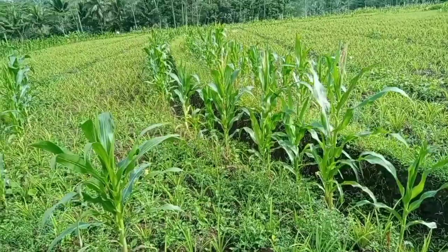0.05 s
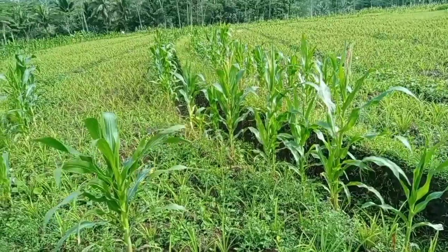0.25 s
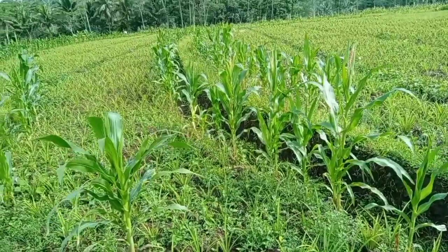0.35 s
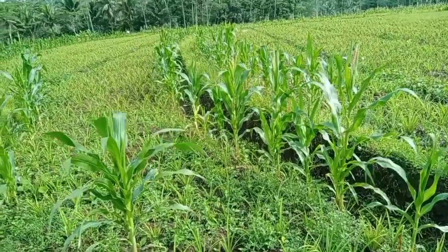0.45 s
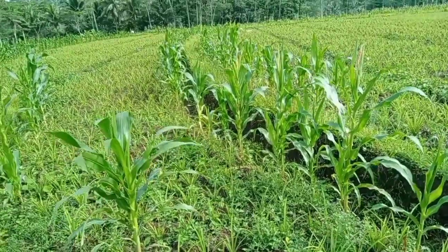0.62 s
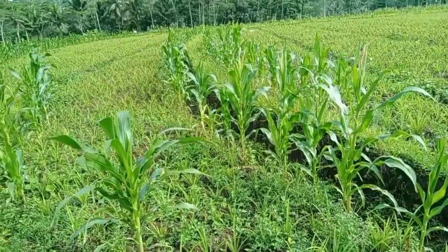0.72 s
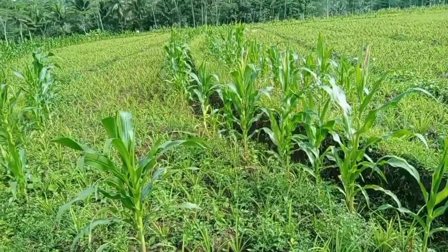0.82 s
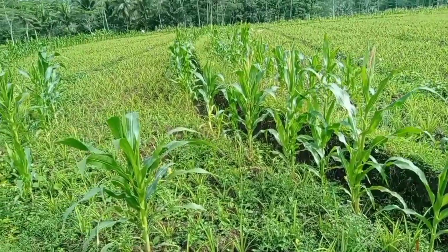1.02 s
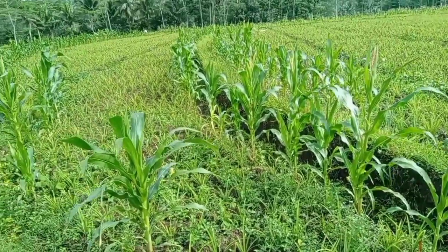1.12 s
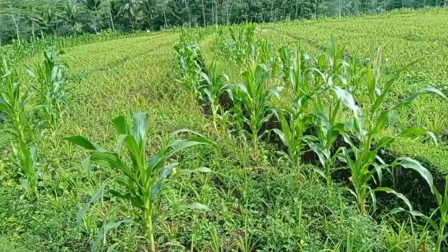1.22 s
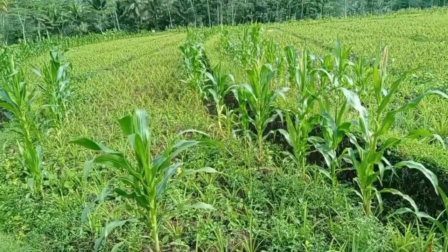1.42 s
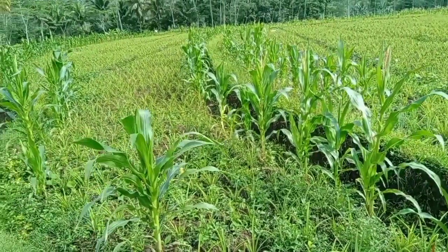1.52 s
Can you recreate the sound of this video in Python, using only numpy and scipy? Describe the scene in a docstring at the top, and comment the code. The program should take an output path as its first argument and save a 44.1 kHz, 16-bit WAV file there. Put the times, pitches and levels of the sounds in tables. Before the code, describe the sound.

Water trickles steadily along a ditch in an open field for about one and a half seconds, a fine bubbling with small plops, gurgles and splashes over a distant rush. From about 0.2 to 0.7 seconds a gust of wind buffets the microphone with low rumble and thumps, then drops to light puffs. Faint high insect buzzing and a thin cricket tone continue behind the water.

```python
"""Trickling ditch in a breezy field

Water trickles along a ditch: a fizz of small ringing bubbles with louder plops, gurgles and splashes,
over a far rush. Wind eddies buffet the microphone, in one strong gust and then in light puffs.
Insects sing in the grass: two high buzzes of falling wing strokes and thin cricket tones."""
import sys
import numpy as np
from scipy import signal
from scipy.io import wavfile
from scipy.ndimage import uniform_filter1d

SR = 44100
rng = np.random.default_rng(int(sys.argv[2]) if len(sys.argv) > 2 else 0)


def generate_wav(sig):
    """Save sig (samples, or channels by samples) to the path in sys.argv[1] as 16-bit PCM at SR."""
    pcm = np.round(np.clip(np.atleast_2d(sig).T, -1, 1) * 32767).astype(np.int16)
    wavfile.write(sys.argv[1], SR, pcm)


N = 68355
TIME = np.arange(N) / SR
WATER_EDGE_HZ = 4920  # the bubbles' treble ends here

# Colour of the far rush of water and field. Each row: frequency in Hz, relative level in dB.
RUSH_COLOUR = [(30, 2), (100, 7), (300, 1.5), (600, 2), (1100, -6.5), (1700, -3), (2400, 6), (3500, -3.5),
               (4300, -5), (4750, -12), (5050, -20.5), (5600, -18), (6500, -31.5), (7400, -20), (9200, -11),
               (10500, -23), (12500, -30), (15500, -37)]
# Fader ride of the wind. Each row: time in seconds, relative level in dB.
WIND_LEVEL = [(0, -45), (.034, -37.5), (.06, -56), (.09, -44), (.13, -32.5), (.168, -41), (.212, -17.5),
              (.245, -24.5), (.275, -21), (.325, -21), (.355, -26), (.385, -18), (.42, -18.5), (.46, -30),
              (.49, -24.5), (.53, -30), (.575, -28), (.612, -23.5), (.646, -36.5), (.668, -26.5),
              (.735, -55), (.765, -47), (.785, -29.5), (.866, -41.5), (.92, -33), (.962, -35.5),
              (1.01, -49.5), (1.07, -32.5), (1.118, -49), (1.204, -34), (1.252, -31), (1.306, -38.5),
              (1.34, -49), (1.39, -32.5), (1.48, -47.5), (1.55, -46)]
# Colour of the wind at full strength. Each row: frequency in Hz, relative level in dB.
WIND_COLOUR = [(25, -20), (45, -8), (65, -0.5), (110, 2), (170, -5), (280, -10), (400, -18.5), (600, -26),
               (1000, -65)]
# Colour of the fizz. Each row: bubble pitch in Hz, relative level in dB.
BUBBLE_COLOUR = [(700, -18), (1200, -13), (1600, -8), (2050, 0), (2600, 2.5), (3200, -4), (3900, -8),
                 (4600, -10)]
# Louder single bubbles. Each row: start in seconds, relative level in dB, pitch in Hz.
PLOPS = [(.0528, -22.5, 2250), (.0912, -28, 2990), (.1271, -26.5, 2110), (0.1457, -21, 2670),
         (0.2067, -23, 2480), (0.226, -33, 3020), (0.2616, -24, 2000), (0.538, -26.5, 1940),
         (.5621, -30, 1980), (.636, -24, 2330), (.7751, -34, 2070), (.8335, -27, 2880), (0.9605, -21, 2400),
         (1.038, -26, 2650), (1.0876, -25.5, 2600), (1.1336, -20.5, 1960), (1.182, -26.5, 1970),
         (1.4206, -27.5, 2580)]
# Fader rides of the two buzzing insects. Each row: time in seconds, relative level in dB.
HIGH_BUZZ_LEVEL = [(0, -64), (.47, -67.5), (.51, -84), (.72, -83), (.86, -71), (1.15, -66), (1.4, -61),
                   (1.55, -61)]
LOW_BUZZ_LEVEL = [(0, -67), (.3, -72), (.62, -77), (.8, -62.5), (.95, -66), (1.18, -65.5), (1.55, -71)]
# Bubble clusters. Each row: start in seconds, length in seconds, relative level in dB, pitch in Hz.
GURGLES = [(0.05, 0.014, -38, 2780), (.09, 0.024, -40, 2750), (0.129, 0.039, -43.5, 2940),
           (0.202, 0.014, -41.5, 2760), (0.228, 0.018, -38.5, 2940), (0.343, .025, -42.5, 2600),
           (.529, .012, -41.5, 808), (0.633, .022, -41.5, 2250), (0.804, 0.032, -43.5, 3000),
           (.84, 0.065, -50.5, 1465), (0.879, .025, -45.5, 3470), (0.918, 0.053, -41.5, 2710),
           (1.032, .03, -42, 2700), (1.105, .035, -48, 905), (1.132, 0.049, -42.5, 2010),
           (1.266, .05, -48, 865), (1.324, 0.043, -42.5, 3190), (1.415, 0.037, -56, 2420),
           (1.474, .028, -43, 2860), (1.522, 0.026, -45, 3650)]
# Drops that splash. Each row: start in seconds, relative level in dB.
SPLASHES = [(0.052, -39.5), (.133, -32), (.155, -32.5), (0.206, -36.5), (0.36, -35), (.468, -41),
            (0.539, -35.5), (.594, -34.5), (0.898, -36), (1.039, -34), (1.061, -40), (1.091, -34.5),
            (1.136, -37), (1.228, -46)]
# Colour of splash and spray. Each row: frequency in Hz, relative level in dB.
SPLASH_COLOUR = [(800, -25), (2000, 3.5), (3200, 6.5), (4600, -2.5), (5200, -13.5), (6500, -15.5),
                 (7500, -10.5), (9200, -6), (10500, -25), (12000, -27), (15000, -41)]
# Single eddies that thump the microphone.
# Each row: centre in seconds, relative level in dB, half width in seconds, swing frequency in Hz.
THUMPS = [(0.2069, -9.5, 0.0014, 193), (0.2231, -12, 0.001, 225), (0.2656, -12.5, 0.002, 149),
          (.292, -16.5, 0.00086, 200), (0.3299, -20, 0.00064, 142), (.341, -17.5, 0.00087, 300),
          (0.375, -16, .0021, 112), (.405, -8, 0.00075, 170), (.416, -9, .0016, 129),
          (.44, -15, .0015, 150), (0.4819, -9.5, 0.00095, 85), (0.5241, -11.5, 0.0012, 184),
          (0.554, -21, .0012, 225), (.611, -11.5, 0.0018, 150), (.782, -26.5, 0.0011, 200),
          (1.2037, -23, 0.0013, 225)]
# Tiny dry ticks. Each row: start in seconds, relative level in dB.
TICKS = [(.5325, -43), (1.393, -37)]


def from_db(db):
    """Decibels to gain."""
    return 10 ** (np.asarray(db) / 20)


def unit_rms(x):
    """Scale to an rms of 1."""
    return x / np.sqrt(np.mean(x ** 2) + 1e-20)


def ride(rows):
    """A fader ride, read at every sample."""
    return np.interp(TIME, *np.transpose(rows))


def colour_db(colour, hz):
    """Read a colour curve on a log-frequency axis."""
    freqs, levels = np.transpose(colour)
    return np.interp(np.log(hz), np.log(freqs), levels)


def drift(rate_hz):
    """Smooth random wander with a spread of 1."""
    hop, run_in = 40, 2000
    pole = np.exp(-2 * np.pi * rate_hz * hop / SR)
    noise = rng.standard_normal(N // hop + run_in + 2)
    wander = signal.lfilter([1], [1, -2 * pole, pole * pole], noise)[run_in:]
    return np.interp(np.arange(N) / hop, np.arange(len(wander)), unit_rms(wander))


def filtered(x, kind, hz, order):
    """A Butterworth low, high or band pass."""
    return signal.sosfilt(signal.butter(order, hz, kind, fs=SR, output="sos"), x)


def noise_bands(low_hz, high_hz, count):
    """Neighbouring bands of unrelated noise, as (centre in Hz, samples)."""
    edges = np.geomspace(low_hz, high_hz, count + 1)
    for low, high in zip(edges, edges[1:]):
        noise = rng.standard_normal(N + SR // 10)
        yield np.sqrt(low * high), filtered(noise, "band", [low, high], order=3)[-N:]


def add(track, start_s, sound):
    """Lay a short sound onto a track."""
    i = int(np.clip(start_s * SR, 0, N - 1))
    track[i:i + len(sound)] += sound[:N - i]


def rush(flicker_db=2.0):
    """The far rush of water and field: a smooth bed, each band flickering a little."""
    bed = sum(from_db(colour_db(RUSH_COLOUR, hz) + flicker_db * drift(33)) * band
              for hz, band in noise_bands(25, 16000, count=56))
    return from_db(-46.5) * unit_rms(bed)


def wind(full_db=-9, knee_hz=148, dulling=0.28, even_s=0.021):
    """Eddies rumble on the microphone port; stronger wind is louder and brighter."""
    level_db = ride(WIND_LEVEL)
    tilt_db_per_octave = dulling * np.maximum(full_db - level_db, 0)
    eddies = np.zeros(N)
    for hz, band in noise_bands(22, 1200, count=14):
        octaves_over_knee = max(np.log2(hz / knee_hz), 0)
        eddies += from_db(colour_db(WIND_COLOUR, hz) - tilt_db_per_octave * octaves_over_knee) * band
    # Even out the noise so that the ride shapes the gusts.
    window = int(even_s * SR)
    power = uniform_filter1d(uniform_filter1d(eddies ** 2, window), window)
    rumble = from_db(level_db - 0.5) * eddies / np.sqrt(power + 1e-20)
    return filtered(rumble, "high", 49.4, order=4)


def bubble(hz, cycles, attack_s, rise=0.072):
    """A bubble rings, dying by 60 dB over the given cycles as its pitch lifts."""
    t60 = cycles / hz
    t = TIME[:int(t60 * SR)]
    phase = 2 * np.pi * hz * t * (1 + rise / 2 * t / t60)
    return np.sin(phase) * from_db(-60 * t / t60) * (1 - np.exp(-t / attack_s))


def trickle(bubbles_per_s=2200, spread_db=4.5):
    """Running water: a fizz of countless small bubbles with a few louder plops on top."""
    fizz, plops = np.zeros(N), np.zeros(N)
    for when, pitch, strength, ring in rng.random((int(bubbles_per_s * N / SR), 4)):
        hz = 700 * (4700 / 700) ** pitch
        accent_db = spread_db * min(-np.log(1 - strength), 4)  # most are quiet, a few stand out
        gain = from_db(colour_db(BUBBLE_COLOUR, hz) + accent_db)
        add(fizz, when * N / SR, gain * bubble(hz, cycles=37.3 * (.5 + ring), attack_s=0.00033))
    for start, db, hz in PLOPS:
        add(plops, start, from_db(db - 2.5) * bubble(hz, cycles=45.3, attack_s=0.00045))
    return filtered(from_db(-46) * unit_rms(fizz) + plops, "low", WATER_EDGE_HZ, order=12)


def ditch(water, t60_s=.06, predelay_s=.003, wet_db=-10.5):
    """The banks of the ditch throw back a short, dense tail."""
    t = TIME[:SR // 10]
    tail = rng.standard_normal(len(t)) * from_db(-60 * t / t60_s) * (t > predelay_s)
    tail /= np.sqrt(np.sum(tail ** 2))
    return water + from_db(wet_db) * signal.fftconvolve(water, tail)[:N]


def buzz(level, strokes_per_s, pitch_hz, fall_hz, unsteady, rough_hz):
    """An insect rubs its wings; each stroke is a short tone that falls in pitch."""
    stroke = np.cumsum(strokes_per_s * (1 + unsteady * drift(1.7))) / SR % 1
    hz = pitch_hz - fall_hz * (stroke - .5) + rough_hz * drift(202)
    tone = np.sin(2 * np.pi * np.cumsum(hz) / SR)
    return from_db(ride(level)) * unit_rms(np.sin(np.pi * stroke) ** 2 * tone)


def cricket(hz, waver_hz, flutter_db):
    """A far cricket: a thin, slightly wavering tone."""
    flutter = from_db(flutter_db * drift(30))
    phase = 2 * np.pi * np.cumsum(hz + waver_hz * drift(65)) / SR
    return unit_rms(flutter * np.sin(phase))


def insects(swells_per_s=7.88, swell_peak_s=0.78, swell_db=4.5, chirp_end_s=0.073, release_s=.015):
    """Two buzzes, the lower one pulsing, with a steady cricket and a lower chirp that soon stops."""
    high = buzz(HIGH_BUZZ_LEVEL, 81, pitch_hz=9860, fall_hz=1020, unsteady=.005, rough_hz=50.4)
    low = buzz(LOW_BUZZ_LEVEL, 72, pitch_hz=8600, fall_hz=443, unsteady=.055, rough_hz=98.5)
    swells = from_db(swell_db * np.cos(2 * np.pi * swells_per_s * (TIME - swell_peak_s)))
    steady = from_db(-63.5) * cricket(hz=4760, waver_hz=21.9, flutter_db=2)
    chirp = from_db(-49.5) * cricket(hz=3970, waver_hz=70, flutter_db=3)
    chirp_fade = np.clip((chirp_end_s - TIME) / release_s, 0, 1)
    return high + swells * low + steady + chirp_fade * chirp


def gurgles(bubbles_per_s=450, spread_octaves=0.304):
    """Folding water lets go clusters of bubbles of about one size."""
    track = np.zeros(N)
    for (start, length, db, centre_hz), draws in zip(GURGLES, rng.random((len(GURGLES), 60, 3))):
        cluster = np.zeros(N)
        count = max(int(bubbles_per_s * length), 3)
        for when, pitch, strength in draws[:count]:
            hz = centre_hz * 2 ** (spread_octaves * (2 * pitch - 1))
            ring = bubble(hz, cycles=47, attack_s=0.00043)
            add(cluster, start + when * length, (.5 + strength) * ring)
        cluster_rms = np.sqrt(np.sum(cluster ** 2) / (length * SR))
        track += from_db(db - 2) * cluster / cluster_rms
    return filtered(track, "low", WATER_EDGE_HZ, order=12)


def splashes(spray_per_s=200, attack_s=0.0005, t60_s=0.02):
    """Drops burst into short soft-edged hisses: a few distinct ones over a fine random spray."""
    hiss = sum(from_db(colour_db(SPLASH_COLOUR, hz)) * band
               for hz, band in noise_bands(700, 16000, count=26))
    spray_hits = rng.random(N) < spray_per_s / SR
    drops = spray_hits * from_db(-48 + np.minimum(rng.exponential(1, N), 4))
    for start, db in SPLASHES:
        add(drops, start, from_db([db]))
    # Each drop opens the hiss and lets it die away; overlapping drops add in power.
    power_decay = np.exp(-2 * np.log(1000) / (t60_s * SR))
    power = signal.lfilter([1], [1, -power_decay], drops ** 2 + 1e-18)
    envelope = uniform_filter1d(np.sqrt(power), int(attack_s * SR) + 1)
    return envelope * unit_rms(hiss)


def thumps(port_q=1.8):
    """An eddy is a brief dip in pressure; the microphone's bass cut makes it swing back."""
    track = np.zeros(N)
    for centre, db, half_width, swing_hz in THUMPS:
        dip = -from_db(db + 0.5) * np.exp(-((TIME - centre) / half_width) ** 2)
        omega = 2 * np.pi * swing_hz
        bass_cut = signal.bilinear([1, 0, 0], [1, omega / port_q, omega ** 2], SR)
        track += signal.lfilter(*bass_cut, dip + 1e-18)
    return track


def ticks(hz=12500, t60_s=0.0033):
    """Tiny dry ticks: pinpricks of very high noise."""
    track, t = np.zeros(N), TIME[:SR // 50]
    for start, db in TICKS:
        add(track, start, from_db(db - 60 * t / t60_s) * rng.standard_normal(len(t)))
    return filtered(track + 1e-18, "band", [hz / 1.25, hz * 1.25], order=2)


def splat(start_s=1.229, hz=3200, t60_s=0.014):
    """One drop lands hard: a short, dense burst of upper-middle hiss."""
    band_hz = [hz / 1.45, hz * 1.45]
    hiss = unit_rms(filtered(rng.standard_normal(N), "band", band_hz, order=3))
    envelope = from_db(-28 - 60 * np.maximum(TIME - start_s, 0) / t60_s) * (TIME >= start_s)
    return filtered(envelope * hiss + 1e-18, "band", band_hz, order=3)


def scene():
    """Water, wind and insects at one microphone."""
    water = rush() + ditch(trickle() + gurgles() + splashes()) + splat()
    return (water + wind() + thumps() + insects() + ticks())[None]


def record(dry, cutoff_hz=15550):
    """A steep high cut takes the very top off the mix."""
    return signal.sosfilt(signal.ellip(10, .1, 80, cutoff_hz, fs=SR, output="sos"), dry)


dry = scene()
out = record(dry)
generate_wav(out)
```